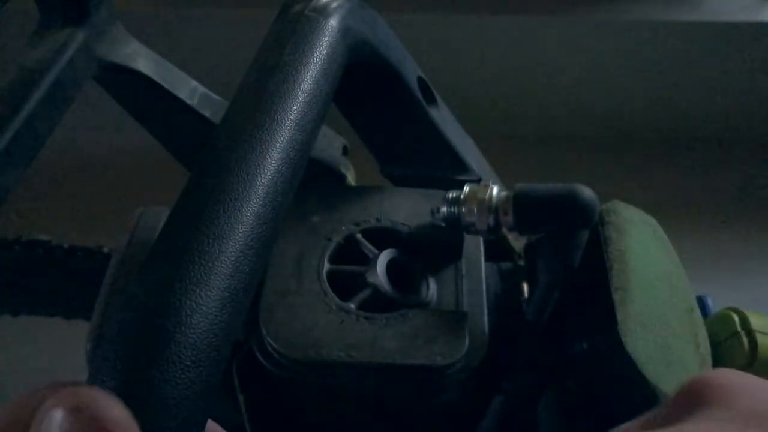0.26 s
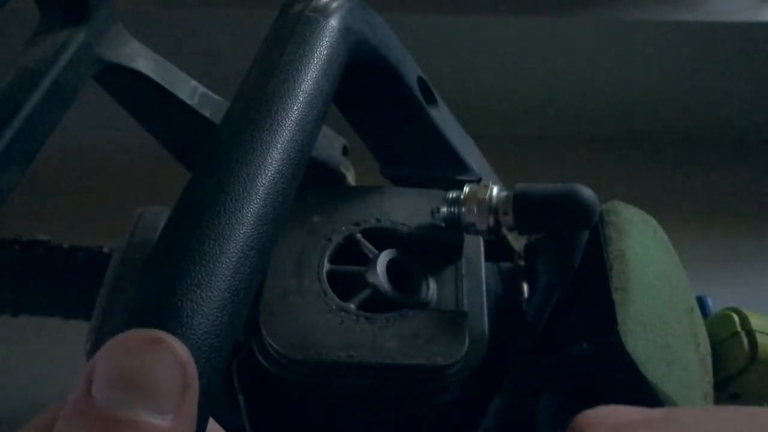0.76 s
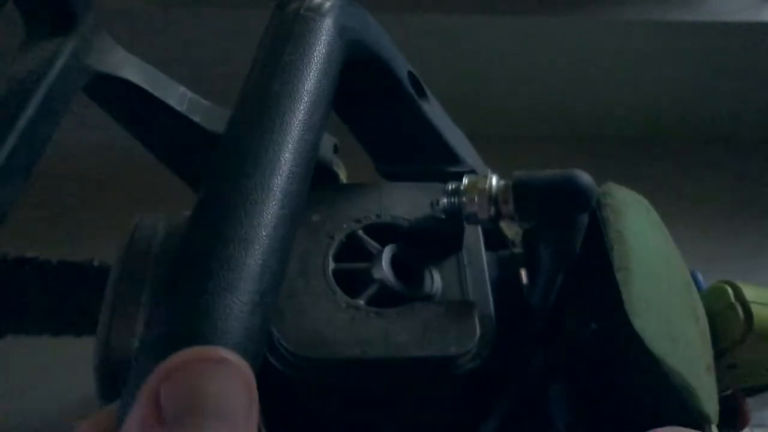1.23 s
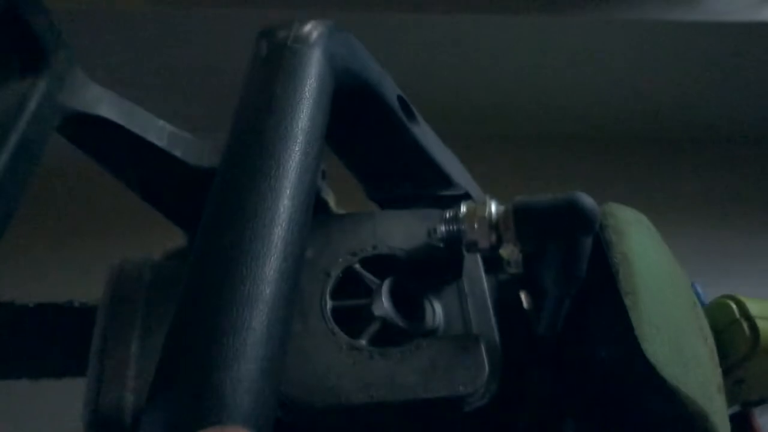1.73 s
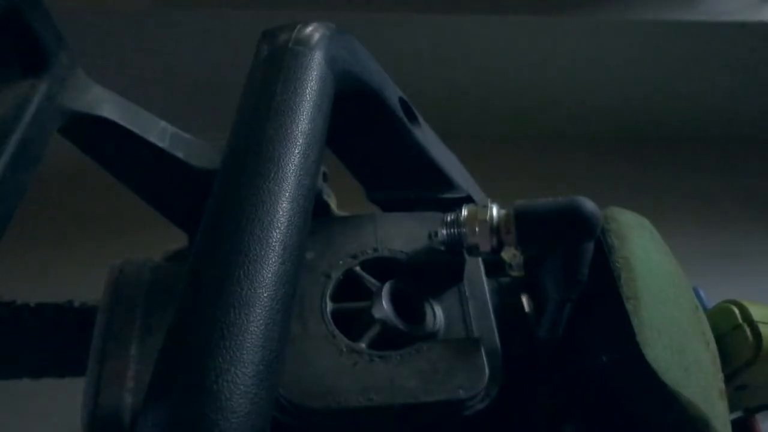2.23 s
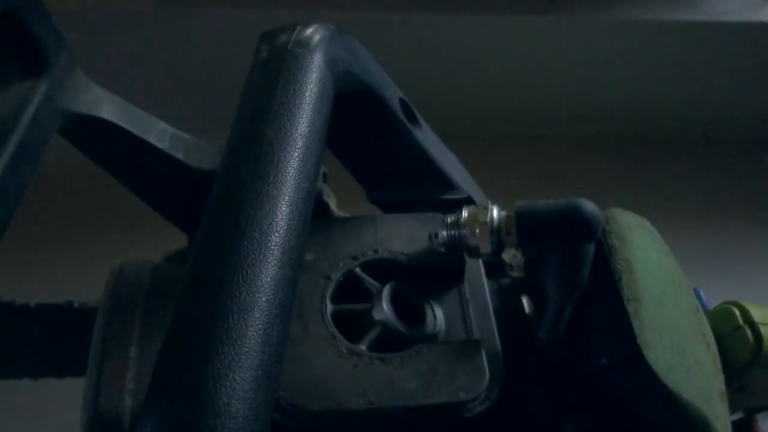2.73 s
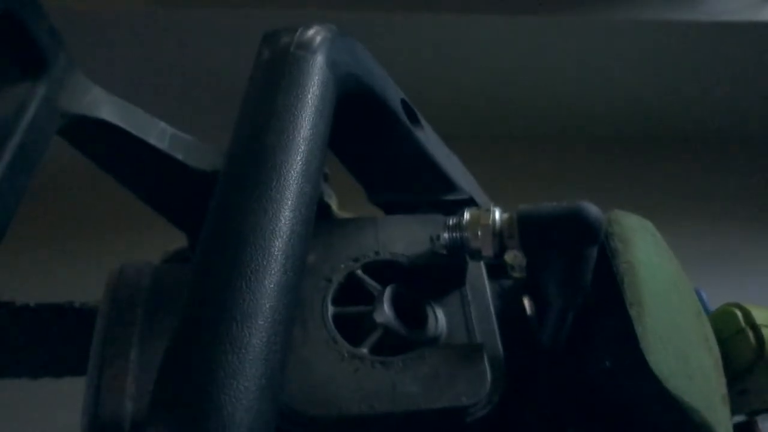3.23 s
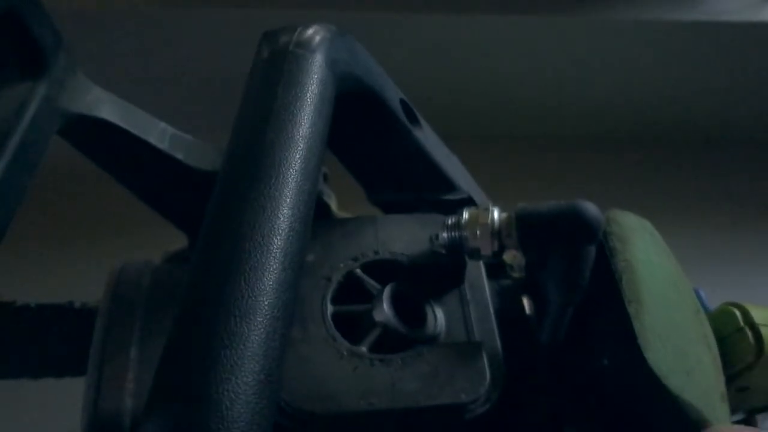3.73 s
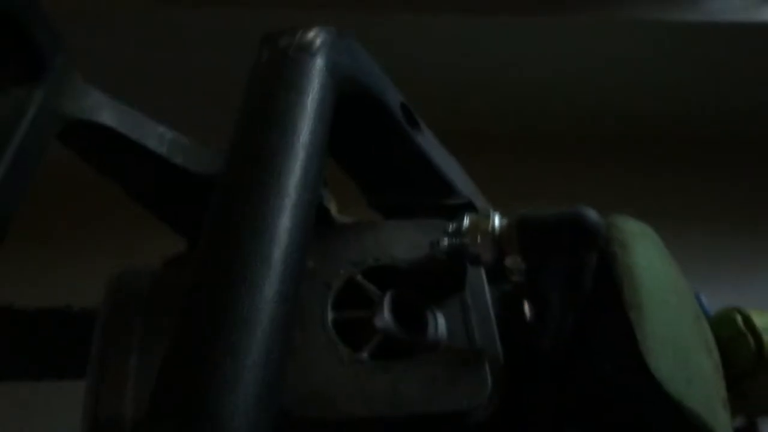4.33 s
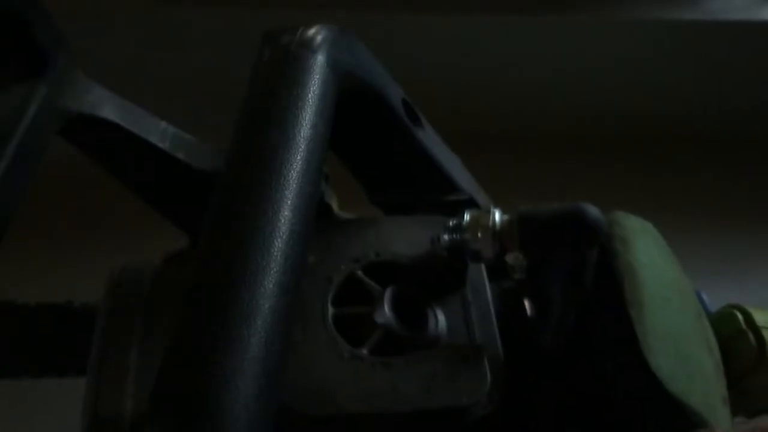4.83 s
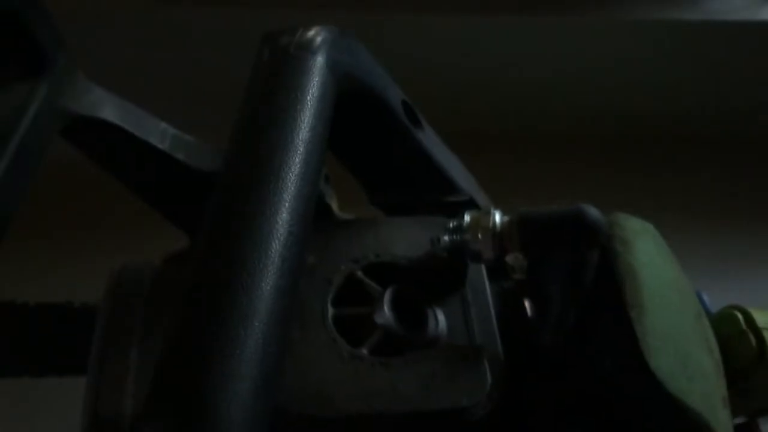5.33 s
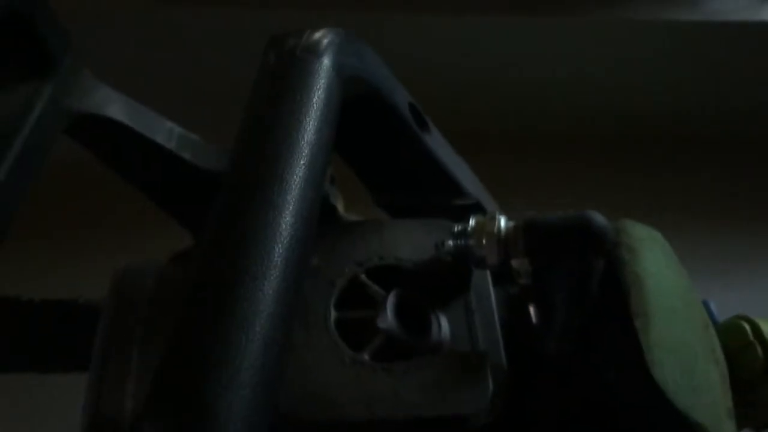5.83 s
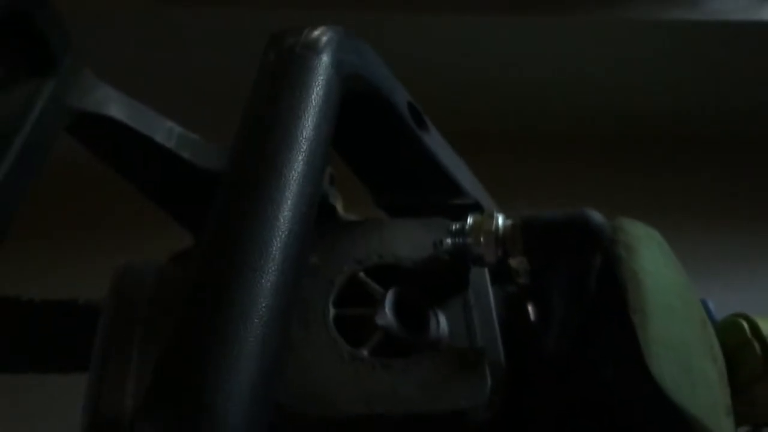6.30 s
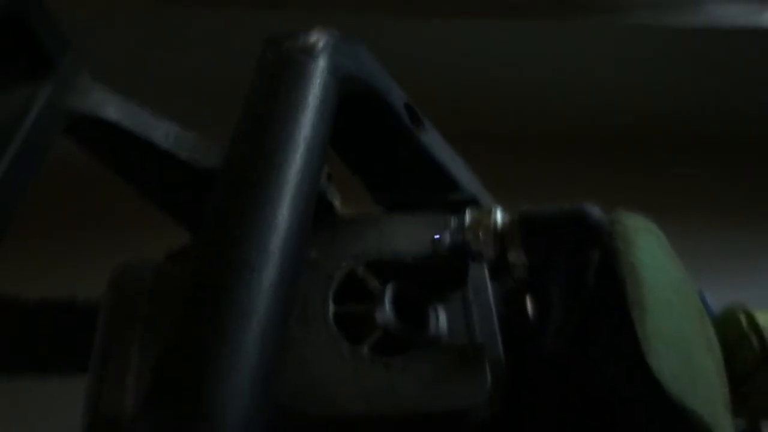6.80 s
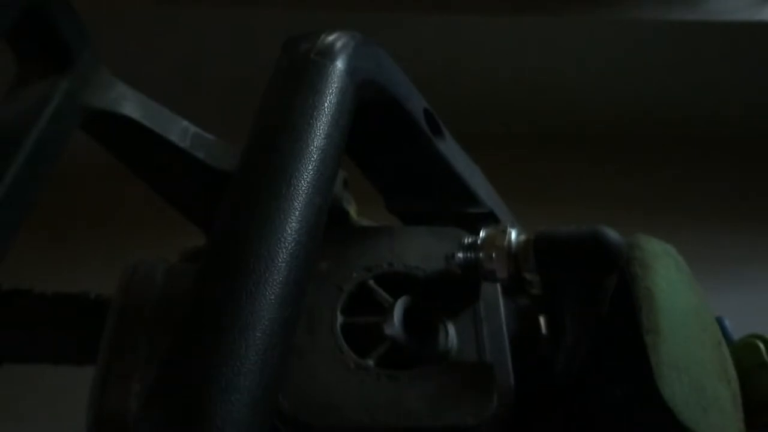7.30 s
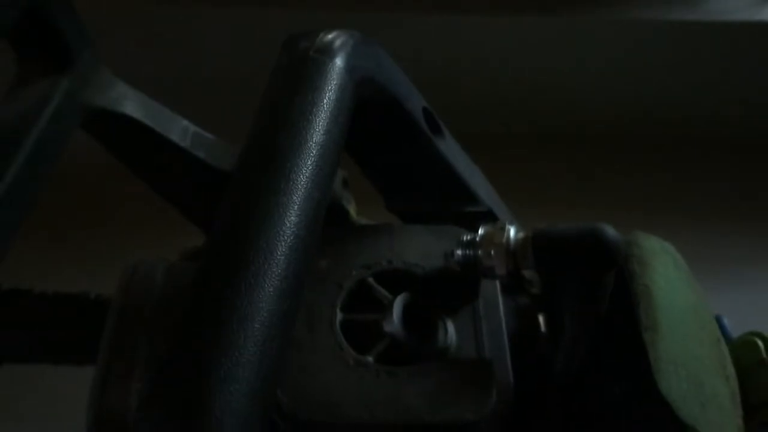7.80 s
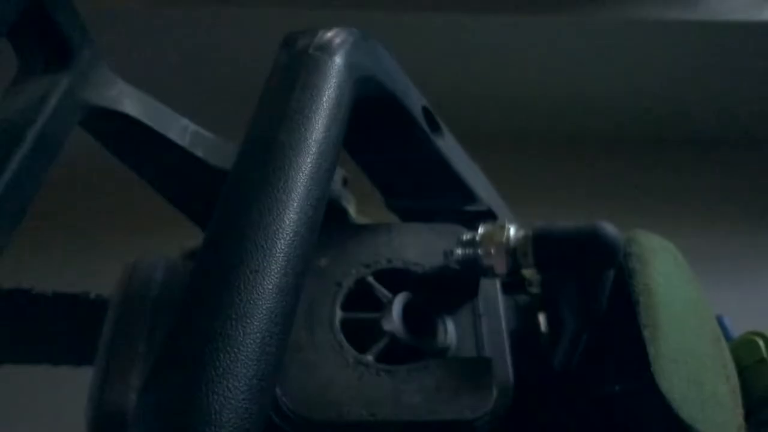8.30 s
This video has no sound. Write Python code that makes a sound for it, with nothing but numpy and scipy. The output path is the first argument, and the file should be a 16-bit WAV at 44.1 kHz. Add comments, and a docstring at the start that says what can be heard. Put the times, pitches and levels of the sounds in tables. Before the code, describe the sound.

A chainsaw's starter rope is yanked four times, chuffing and thumping without firing, each pull followed by a fast ratcheting rewind in a garage.

```python
"""A faint hum in still air, then small ticks and rubs as hands grip a chainsaw in a garage.
Its starter rope is pulled four times and the engine never fires. Each pull: the pawls catch the ringing
flywheel, then the piston pumps air in chuffs, thumps and slaps. Each return: the spring rewinds the rope
while the pawls ratchet over the flywheel. At last the saw is shifted with a few knocks.
Noise is coloured and shaped by envelopes; impulses set decaying sines ringing."""
import sys
import numpy as np
from scipy import signal
from scipy.fft import rfft, irfft, next_fast_len
from scipy.io import wavfile
from scipy.ndimage import uniform_filter1d

SR = 44100
rng = np.random.default_rng(int(sys.argv[2]) if len(sys.argv) > 2 else 0)


def dump_mix(stems):
    """Bounce the given channels to the path in sys.argv[1] as a 16-bit WAV at rate SR."""
    frames = np.atleast_2d(stems).T  # one column per channel
    limited = np.clip(frames, -1, 1)  # hard clip at full scale
    pcm = np.round(limited * 32767).astype(np.int16)
    wavfile.write(sys.argv[1], SR, pcm)


N = 377055

# Levels are relative: each sound adds its own trim. A half length runs from the middle to 1/e of the peak.
# still air behind everything: [t/s, level/dB]
AIR_LEVEL = [(1.8, -62), (8.1, -68)]
# colour of the still air: [f/Hz, level/dB]
AIR_COLOUR = [(24, -18), (40, 2), (124, 4), (942, -11), (1440, -17.5), (15500, -26)]
# faint hum, silent after the last row: [t/s, level/dB]
HUM_LEVEL = [(0, -72), (.5, -61.5), (1.6, -58.5), (2.3, -74)]
# plastic ticks under the hands: [t/s, level/dB, f/Hz]
TICKS = [(.654, -69, 1610), (.86, -67.5, 3030), (1.212, -57.5, 2340), (1.694, -65, 1050),
         (2.176, -64, 2250), (2.398, -61, 2100)]
# hands slide on the handles: [middle t/s, level/dB, half length/s]
GRIPS = [(1.23, -50, 0.076), (1.56, -54, 0.1), (1.74, -53.5, 0.093)]
# colour of skin on the handles: [f/Hz, level/dB]
SKIN_COLOUR = [(50, -13), (100, -8), (165, 6.5), (420, -8), (1100, -17), (3300, -16.5), (6000, -23.5),
               (15000, -39)]
# dull knocks of loose parts and the housing: [t/s, level/dB]
KNOCKS = [(2.175, -44.5), (3.904, -32), (4.891, -29), (6.215, -37), (6.256, -30), (7.458, -28.5),
          (7.878, -37.5), (7.948, -35.5), (8.041, -44.5), (8.118, -40), (8.308, -34), (8.342, -33.5),
          (8.361, -28), (8.526, -40)]
# colour of a dull knock: [f/Hz, level/dB]
KNOCK_COLOUR = [(150, 3), (300, 10), (550, 0), (900, -1.5), (1300, 5), (1900, 0.5), (2600, -6),
                (3600, -5.5), (7000, -14.5), (15000, -27)]
# modes of the housing shaken by a knock: [f/Hz, level/dB]
HOUSING_MODES = [(161, -12), (215, -16), (295, -20)]
# rope and spring coils scrape: [middle t/s, level/dB, half length/s]
SCRAPES = [(.862, -59, 0.016), (3.446, -27.5, 0.025), (4.893, -22, 0.0099), (4.95, -32.5, 0.017),
           (6.185, -28.5, 0.02), (6.248, -37.5, 0.041), (6.38, -52, 0.038), (7.275, -28.5, 0.016),
           (7.453, -24, 0.0052), (7.491, -35, 0.014)]
SCRAPE_GRIT_DB = 2.5  # spread of the roughness
# colour of clattering pawls and scraping rope: [f/Hz, level/dB]
CLATTER_COLOUR = [(900, -30.5), (1700, -8.5), (2550, -11.5), (3100, -2.5), (4400, -6.5), (5700, -5.5),
                  (7000, 0), (8200, -2.5), (9300, -3.5), (15500, -8)]

# rope pulls: [pawls catch t/s, hand eases off t/s, clack level/dB, its brightness level/dB,
#              flywheel ring level/dB, cover clunk level/dB, rush of air level/dB, crank rumble level/dB]
PULLS = [(2.2466, 3.111, -18.5, -9.5, -35, -33.5, -35, -36.5),
         (3.865, 4.348, -21.5, -0.5, -43, -20, -33, -36.5), (5.139, 5.655, -21, 4.5, -32, -42, -34.5, -39),
         (6.4587, 6.9, -24, 8, -32, -36.5, -29, -38)]
# colour of the catching clack: [f/Hz, level/dB]
CATCH_COLOUR = [(200, 13), (550, -1.5), (1200, 8), (1800, 0.5), (2500, -6.5), (3300, 1), (5400, -2),
                (8500, -15)]
# colour of its bright click: [f/Hz, level/dB]
CLICK_COLOUR = [(3000, 3.5), (8500, -5), (12300, 2), (15500, -5)]
# flywheel and starter cup modes: [f/Hz, level/dB, t60/s after a catch]
FLYWHEEL_MODES = [(4121, 0, .19), (4335, -1, .2), (4404, -7, .16), (4570, -7, .38), (5337, 2, .2),
                  (7100, -3, .07), (10358, -13, .08), (12318, -8, .12), (13196, -14, .11)]
# starter cover modes as the pawls catch: [f/Hz, level/dB, t60/s]
COVER_MODES = [(1210, -8, 0.027), (3620, -23, 0.11), (4700, -13, 0.098), (9100, -9, 0.034)]
# crank turns: [port opens t/s, exhaust thump t/s, port closes t/s, strength level/dB]
TURNS = [(2.447, 2.4787, 2.554, -24), (2.683, 2.7063, 2.754, -13), (2.854, 2.8752, 2.913, -13),
         (2.999, 3.0178, 3.052, -12), (3.902, 3.909, 3.981, -25), (4.068, 4.0861, 4.109, -12),
         (4.166, 4.1812, 4.197, -13), (4.247, 4.262, 4.277, -13), (4.327, 4.3424, 4.362, -14),
         (5.206, 5.2309, 5.276, -24), (5.351, 5.3678, 5.391, -14), (5.451, 5.4669, 5.486, -13),
         (5.541, 5.5559, 5.573, -13), (5.627, 5.6422, 5.664, -14), (6.517, 6.5395, 6.576, -22),
         (6.636, 6.6506, 6.665, -14), (6.711, 6.7247, 6.736, -13), (6.775, 6.7895, 6.799, -12),
         (6.836, 6.8507, 6.860, -12), (6.912, 6.9283, 6.963, -16)]
TOP_SHARE = .61  # where in the closed stroke the piston tips over the top
LAST_STROKE_S = .11  # length of the coasting stroke
# colour of rushing air: [f/Hz, level/dB]
RUSH_COLOUR = [(350, -7.5), (600, 1), (1200, 1), (2200, -4), (3340, -7), (3940, -8.5), (9490, -15.5),
               (11300, -12.5), (16000, -22)]
# colour of the crank rumble: [f/Hz, level/dB]
RUMBLE_COLOUR = [(50, -15), (170, 3), (300, 3), (410, -3.5), (550, -11.5), (900, -54)]
CATCH_SPEED_SHARE, RUSH_DB_PER_DOUBLING = 0.23, 8  # crank speed at the catch; loudness gained with speed
RUSH_RISE_DB_PER_S, RUSH_FALL_DB_PER_S = 105, 262
RUMBLE_RISE_DB_PER_S, RUMBLE_FALL_DB_PER_S = 149, 99
WHISTLE_WIDTH_HZ = 75
# the piston rocks back and lets out a soft puff: [t/s, level/dB]
PUFFS = [(3.731, -24), (6.292, -23.5), (7.579, -26.5)]
# the cord squeaks: [middle t/s, level/dB, half length/s]
SQUEAKS = [(2.44, -48, .025), (3.18, -52, .02)]
# the piston slaps at the top of a stroke: [t/s, level/dB, trapped air f/Hz]
SLAPS = [(2.633, -20.5, 1790), (2.816, -19.5, 1820), (2.966, -23, 1350), (3.1062, -23, 1810),
         (4.0379, -20, 1780), (4.144, -29.5, 1690), (4.3068, -24.5, 1310), (4.4313, -29.5, 1810),
         (5.432, -28, 1300), (6.6143, -22, 1500), (6.7603, -21, 1850)]
# cylinder wall modes under a slap: [f/Hz, level/dB, t60/s]
CYLINDER_MODES = [(1940, -10.5, 0.045), (3025, -12, 0.031)]

# rope returns: [start t/s, handle home t/s, whirr level/dB, swell at home level/dB,
#                pawl snap level/dB, pawl edge ring level/dB]
RETURNS = [(3.176, 3.759, -37, -1, -0.5, -10.5), (4.431, 4.918, -41, 5, 3, -29.5),
           (5.738, 6.229, -39.5, 9.5, 3, -21), (7.004, 7.582, -41.5, 4, 1, -43)]
# colour of the whirring pulley: [f/Hz, level/dB]
WHIRR_COLOUR = [(45, -16), (95, -14), (160, 7), (290, -2), (430, -8), (600, -2), (850, -22), (1230, -3.5),
                (1600, -20.5), (3200, -21), (7000, -40)]
WHIRR_START_DB, WHIRR_RISE_S, WHIRR_FALL_DB_PER_S, HOME_SWELL_S = -16, 0.11, 42, 0.06
WHINE_START_HZ, WHINE_TOP_HZ = 470, 674
RATTLES_PER_S, RATTLE_DB = 170, 2.5
# ratchet, one run a return: [first click t/s, teeth/count, shortest gap/s, extra at start/s, extra at end/s]
RATCHET_RUNS = [(3.2531, 16, .01719, .0081, .0294), (4.4636, 19, .01609, .0232, .0342),
                (5.7824, 19, .01571, .0239, .0376), (7.0092, 20, .01519, .0333, .0497)]
# how soon the spring gets the pulley up to speed, how early it slows: [start/teeth, end/teeth]
RATCHET_EASE = (1.637, 2.552)
# a pawl slips over a single tooth: [t/s]
SLIPS = [3.702, 5.743, 6.903, 6.928, 6.959]
# modes of the pawl's own snap: [f/Hz, level/dB, t60/s]
PAWL_MODES = [(6580, -9, 0.006), (7480, -3, 0.0098), (8300, -9.5, 0.017)]
# modes of the pawl's edge: [f/Hz, level/dB, t60/s]
EDGE_MODES = [(3840, -1, 0.0083), (4121, -25.5, 0.062), (14322, -13, .13), (14000, -18, 0.14)]
SING_SPREAD_DB = 4  # how unevenly the teeth set the flywheel singing
GARAGE_T60_S = 0.43
CUTOFF_HZ = 16000


def from_db(db):
    """Decibels to gain."""
    return 10 ** (np.asarray(db) / 20)


def rms_one(x):
    """Scale to unit power."""
    return x / np.sqrt(np.mean(x ** 2) + 1e-20)


def clock():
    """The time of every sample in seconds."""
    return np.arange(N) / SR


def noise(spectrum):
    """Noise of a given colour, falling steeply outside it; rms 1."""
    hz, db = np.transpose(spectrum)
    size = next_fast_len(N)
    log_f = np.log(np.maximum(np.fft.rfftfreq(size, 1 / SR), 1))
    outside = np.abs(log_f - np.clip(log_f, np.log(hz[0]), np.log(hz[-1])))
    shape = from_db(np.interp(log_f, np.log(hz), db)) * np.exp(-2 * np.pi * outside)
    return rms_one(irfft(shape * rfft(rng.standard_normal(size)))[:N])


def flutter(rate_hz):
    """Random wavering up to a given rate; rms 1."""
    lowpass = signal.butter(2, rate_hz, fs=SR, output="sos")
    return rms_one(signal.sosfilt(lowpass, rng.standard_normal(N)))


def narrow(hz, width_hz):
    """Turbulence in a narrow resonance whose centre may move; about rms 1."""
    phase = 2 * np.pi * np.cumsum(hz * np.ones(N)) / SR
    return flutter(width_hz) * np.cos(phase) + flutter(width_hz) * np.sin(phase)


def taps(times, db, spread_db=0):
    """One impulse a contact, its strength varied at random by spread_db."""
    out = np.zeros(N)
    at = np.clip(np.round(times * SR).astype(int), 0, N - 1)
    out[at] = from_db(db + spread_db * rng.standard_normal(len(times)))
    return out


def grains(rate_per_s, weakest, strongest):
    """Impulses at random moments and of random height."""
    return (rng.random(N) < rate_per_s / SR) * rng.uniform(weakest, strongest, N)


def fade(impulses, t60):
    """Each impulse starts an envelope that dies away."""
    return signal.lfilter([1], [1, -from_db(-60 / (t60 * SR))], impulses + 1e-18)


def ring(impulses, hz, t60):
    """Each impulse sets a decaying sine ringing, scaled by the impulse's height."""
    r = from_db(-60 / (t60 * SR))
    w = 2 * np.pi * hz / SR
    return signal.lfilter([0, np.sin(w)], [1, -2 * r * np.cos(w), r * r], impulses + 1e-18)


def chirp(impulses, start_hz, end_hz, glide_s, t60):
    """Each impulse rings a cavity whose pitch glides as it dies."""
    t = np.arange(SR // 10) / SR
    hz = end_hz + (start_hz - end_hz) * np.exp(-t / glide_s)
    glide = np.sin(2 * np.pi * np.cumsum(hz) / SR) * from_db(-60 * t / t60)
    return signal.fftconvolve(impulses, glide)[:N]


def swells(rows):
    """Bell-shaped envelopes from rows of (middle, dB, half length)."""
    t, out = clock(), np.zeros(N)
    for s, db, half in rows:
        near = slice(max(int((s - np.pi * half) * SR), 0), int((s + np.pi * half) * SR))
        out[near] += from_db(db) * np.exp(-((t[near] - s) / half) ** 2)
    return out


def still_air():
    """Steady coloured noise whose level drifts slowly."""
    return from_db(np.interp(clock(), *np.transpose(AIR_LEVEL))) * noise(AIR_COLOUR)


def faint_hum(hum_hz=118):
    """A low sine wavering a little in phase and level."""
    level = from_db(np.interp(clock(), *np.transpose(HUM_LEVEL), right=-np.inf))
    tone = np.sqrt(2) * np.sin(2 * np.pi * hum_hz * clock() + flutter(4.2) / 2)
    return level * tone * from_db(1.3 * flutter(4.1))


def knock(s, db):
    """A dull blow on the housing: a softened burst of coloured noise."""
    blow = fade(taps(s + 0.00046, db - 3.5), 0.065)
    return uniform_filter1d(blow, size=80) * noise(KNOCK_COLOUR)


def handling():
    """Hands tick and rub on the handles; loose parts knock and shake the housing."""
    slip = rng.standard_normal(N)
    ticks = sum(ring(swells([(when, level, .004)]) * slip, hz, 0.0088) for when, level, hz in TICKS)
    # the plastic creaks under the fingers
    creaks = fade(grains(130, .3, 1), 0.015)
    rub = noise(SKIN_COLOUR) * from_db(1.5 * flutter(40)) + from_db(-6) * creaks * noise(KNOCK_COLOUR)
    s, db = np.transpose(KNOCKS)
    # louder knocks shake the housing a little less in proportion
    shake = sum(ring(taps(s + 0.0035, 0.87 * db + level), hz, 0.23) for hz, level in HOUSING_MODES)
    return ticks + swells(GRIPS) * rub + knock(s, db) + shake


def scrapes():
    """Rope and spring coils scrape: short swells of gritty noise."""
    grit = from_db(SCRAPE_GRIT_DB * flutter(960))
    return swells(SCRAPES) * (noise(CLATTER_COLOUR) + from_db(-10.5) * noise(KNOCK_COLOUR)) * grit


def catches():
    """The pawls clack against the flywheel, which rings like a small bell; the cover clunks."""
    s, _, clack_db, bright_db, ring_db, boom_db, *_ = np.transpose(PULLS)
    blow = fade(taps(s, clack_db - 4), .036) + fade(taps(s, clack_db - 28), .25)
    # each pawl slides for a moment around the bite
    slide = swells([(when, level - 24, .003) for when, level in zip(s, clack_db)])
    clack = (uniform_filter1d(blow, size=110) + slide) * noise(CATCH_COLOUR)
    click = uniform_filter1d(fade(taps(s, clack_db + bright_db), .022), size=40) * noise(CLICK_COLOUR)
    bell = sum(ring(taps(s + 0.003, ring_db + level, 0.66), hz, t60) for hz, level, t60 in FLYWHEEL_MODES)
    boom_colour = [(270, 9.0), (420, 11.0), (600, -4), (1500, -23)]
    boom = fade(taps(s + 0.0029, boom_db - 4), .13) * noise(boom_colour)
    cover = sum(ring(taps(s + 0.003, boom_db + level), hz, t60) for hz, level, t60 in COVER_MODES)
    shake = ring(taps(s + 0.0043, clack_db - 9), 304, .09)
    return clack + click + bell + boom + cover + shake


def turns():
    """Crank turns as columns: port opens, thump, port closes, stroke top, next opening (s); strength (dB)."""
    runs = []
    for catch, *_ in PULLS:
        opens, thump, closes, db = np.transpose([turn for turn in TURNS if catch < turn[0] < catch + 1])
        reopens = np.append(opens[1:], closes[-1] + LAST_STROKE_S)
        top = closes + TOP_SHARE * (reopens - closes)
        runs.append([opens, thump, closes, top, reopens, db])
    return np.hstack(runs)


def piston_height():
    """0 with the port open, 1 at the top of the stroke."""
    _, _, closes, top, reopens, _ = turns()
    return np.interp(clock(), np.column_stack([closes, top, reopens]).ravel(), np.tile([0, 1, 0], len(top)))


def effort():
    """Gains of rush and rumble: both build to the first thump and die as the hand eases; rush follows speed."""
    t, rush, rumble, thumps = clock(), 0, 0, turns()[1]
    for catch, eased, *_, rush_db, rumble_db in PULLS:
        thump = thumps[(thumps > catch) & (thumps < catch + 1)]
        period = np.diff(thump)
        speed = period.min() / period  # 1 at the fastest turn
        speed_times = np.append(catch, thump[:-1] + period / 2)
        speed = np.interp(t, speed_times, np.append(CATCH_SPEED_SHARE * speed[0], speed))
        coast = np.clip(t - eased, 0, 1)
        early = np.clip(thump[0] - t, 0, 1)
        rush_db = rush_db + RUSH_DB_PER_DOUBLING * np.log2(speed)
        rush += (t > catch) * from_db(rush_db - RUSH_RISE_DB_PER_S * early - RUSH_FALL_DB_PER_S * coast)
        rumble_db = rumble_db - RUMBLE_RISE_DB_PER_S * early - RUMBLE_FALL_DB_PER_S * coast
        rumble += (t > catch) * from_db(rumble_db)
    return rush, rumble


def pull():
    """The rope spins the crank: gritty rush eased by compression, rumble, pumping piston and its slaps."""
    (rush, rumble), height = effort(), piston_height()
    grit = from_db(3.6 * flutter(380) + 2.6 * flutter(40))
    # the cord ticks through its eyelet
    ticks = fade(grains(70, 0.35, 1.7), 0.011)
    gritty_air = grit * from_db(-4.0 - 1.9 * height) * noise(RUSH_COLOUR)
    air = rush * (gritty_air + from_db(1.5) * ticks * noise(CLATTER_COLOUR))
    return air + rumble * noise(RUMBLE_COLOUR) + cylinder(rush, height) + exhaust() + slaps()


def squeaks(high_hz=11600, low_hz=9200, sag_hz_per_s=22000):
    """The taut cord squeaks thinly in its eyelet: one band holds, a lower one slides down."""
    out = 0
    for row in SQUEAKS:
        sliding_hz = low_hz - sag_hz_per_s * (clock() - row[0])
        out += swells([row]) * (narrow(high_hz, 450) + narrow(sliding_hz, 200) / 2)
    return out


def cylinder(rush, height, low_hz=860, high_hz=2400):
    """Cylinder air rings and spurts at the ports, and whistles hoarsely higher as the piston shrinks it."""
    opens, thump, closes, _, _, db = turns()
    squeeze_db = np.interp(closes, clock(), 20 * np.log10(rush + 1e-4))
    opening = chirp(taps(opens + 0.00049, db - 3.5), start_hz=1033, end_hz=843, glide_s=0.0041, t60=0.026)
    closing = chirp(taps(closes, squeeze_db / 2 - 2.5), start_hz=780, end_hz=1130, glide_s=0.013, t60=0.03)
    puffs = ring(taps(*np.transpose(PUFFS)), 824, 0.014)
    gulps = ring(taps(thump - .0105, db - 8.5, 3.1), 1090, 0.043)
    spurts = swells([(s - .009, level - 15.5, .0035) for s, level in zip(thump, db)])
    spurts = spurts + fade(taps(opens, db - 19), 0.024)
    jets = spurts * (noise(RUSH_COLOUR) + from_db(-14.5) * narrow(3200, 300))
    # the whistle needs a moving piston
    climbing = uniform_filter1d(np.sign(np.gradient(height)), size=150)
    whistle_hz = low_hz * (high_hz / low_hz) ** (height ** 1.3)
    whistle = narrow(whistle_hz, WHISTLE_WIDTH_HZ) * np.abs(climbing)
    return opening + closing + puffs + gulps + jets + rush * whistle * from_db(-1.5 - 4.3 * height)


def exhaust(pipe_hz=165, build_s=0.0085, stop_s=0.0019, lead_s=0.0012):
    """Air swings in the muffler, grows for a few cycles and is choked by the piston; the housing rings on."""
    _, thump, _, _, _, db = turns()
    t = np.arange(-2000, 2001) / SR
    width_s = np.where(t < lead_s, build_s, stop_s)
    swing = np.cos(2 * np.pi * pipe_hz * t) * np.exp(-((t - lead_s) / width_s) ** 2)
    housing = ring(taps(thump + 0.0083, db - 23.5, 2.02), 150, 0.15)
    housing += ring(taps(thump + 0.0026, db - 16.5, 2.0), 216.5, 0.19)
    return signal.fftconvolve(taps(thump, db + 1.4), swing, "same") + housing


def slaps():
    """At the top of the stroke the piston tips and slaps the wall; the trapped air sets the pitch."""
    s, db, _ = np.transpose(SLAPS)
    s = s + .001
    air = sum(ring(taps(np.array([when + .001]), level + 0.5), hz, 0.017) for when, level, hz in SLAPS)
    wall = sum(ring(taps(s, db + level), hz, t60) for hz, level, t60 in CYLINDER_MODES)
    return air + wall + knock(s, db - 4.5)


def rewind():
    """The pulley whirrs in its plastic cover with a rising whine, changes level near home and runs out."""
    t, level, whine_hz = clock(), 0, WHINE_START_HZ
    for start, home, whirr_db, swell_db, *_ in RETURNS:
        rise_db = np.interp(t, [start, start + WHIRR_RISE_S], [WHIRR_START_DB, 0])
        home_db = swell_db / (1 + ((t - home) / HOME_SWELL_S) ** 2)
        fall_db = WHIRR_FALL_DB_PER_S * np.maximum(t - home, 0)
        level += (t > start) * from_db(whirr_db + rise_db + home_db - fall_db)
        rising_hz = np.interp(t, [start, (start + home) / 2], [WHINE_START_HZ, WHINE_TOP_HZ])
        whine_hz = np.where(t > start, rising_hz, whine_hz)
    whirr = from_db(-3) * noise(WHIRR_COLOUR) + from_db(-15) * narrow(whine_hz, 60)
    whirr = whirr * from_db(1.9 * flutter(54.0))
    # the handle and loose parts rattle along
    rattle = fade(grains(RATTLES_PER_S, 0.08, 1), 0.014) * noise(KNOCK_COLOUR)
    return level * (whirr + from_db(RATTLE_DB) * rattle)


def spin(run, ease):
    """A wheel gathers speed, runs and slows: the time of each step."""
    first, count, shortest, extra_start, extra_end = run
    k = np.arange(count - 1)
    gaps = shortest + extra_start * np.exp(-k / ease[0]) + extra_end * np.exp((k - count + 2) / ease[1])
    return first + np.append(0, np.cumsum(gaps))


def seat_ring(s, db, t60=0.04, bounce_db=-7):
    """Two pawls take turns; each bounces once and rings its seat with a dense set of modes of its own."""
    bounce = s + rng.uniform(.001, .005, len(s))
    t = np.arange(SR // 10) / SR
    bodies = noise(CLATTER_COLOUR)[:2 * len(t)].reshape(2, -1) * from_db(-60 * t / t60)
    out = 0
    for k, body in enumerate(bodies):
        hits = taps(s[k::2], db[k::2], 1.5) + taps(bounce[k::2], db[k::2] + bounce_db, 0.73)
        out += signal.fftconvolve(hits, body)[:N]
    return out


def ratchet(bright_db=9.0):
    """Pawls snap off teeth, chatter in their seats and set the flywheel singing; faster teeth strike harder."""
    s = np.sort(np.concatenate([SLIPS] + [spin(run, RATCHET_EASE) for run in RATCHET_RUNS]))
    db = -11 - 1.2 * np.log2(np.minimum(np.gradient(s), .06) / .02) - np.isin(s, SLIPS)
    # the pawl sits a little differently in each return
    _, home, _, _, snap_db, edge_db = np.transpose(RETURNS)
    which = np.searchsorted(home, s)
    snap_db, edge_db = snap_db[which], edge_db[which]
    snap = 0
    for k, (hz, level, t60) in enumerate(PAWL_MODES):
        # neighbouring modes start in opposite directions
        snap += (-1) ** k * ring(taps(s, db + snap_db + level - 4.0, 2.0), hz, t60)
    snap = signal.sosfilt(signal.butter(2, 2500, "high", fs=SR, output="sos"), snap)
    crack = fade(taps(s, db - 8.5, 1), 0.0039) + fade(taps(s, db - 23.5), 0.09)
    chatter = seat_ring(s, db - 14.0) + crack * noise(CLATTER_COLOUR)
    singing = 0
    for hz, level, t60 in FLYWHEEL_MODES:
        # a light tap favours the high modes
        sing_db = db + level - 33.0 + bright_db * np.log2(hz / 4000)
        singing += ring(taps(s, sing_db, SING_SPREAD_DB), hz, t60 * 2 / 3)
    edge = sum(ring(taps(s, db + edge_db + level, 2), hz, t60) for hz, level, t60 in EDGE_MODES)
    return snap + chatter + singing + edge


def garage(x, wet_db=-15, wall_hz=5000):
    """Scattered echoes off the walls, dull and short."""
    t = np.arange(SR // 2) / SR
    tail = rng.standard_normal(len(t)) * from_db(-60 * t / GARAGE_T60_S) * (t > .006)
    dull = signal.butter(1, wall_hz, fs=SR, output="sos")
    tail = signal.sosfilt(dull, tail / np.linalg.norm(tail))
    return x + from_db(wet_db) * signal.fftconvolve(x, tail)[:N]


def scene():
    """The saw close by, over still air and a faint hum."""
    saw = handling() + scrapes() + catches() + pull() + squeaks() + rewind() + ratchet()
    return (still_air() + faint_hum() + garage(saw))[None]


def record(dry):
    """The microphone loses the deepest bass; the top is cut steeply."""
    lean = signal.sosfilt(signal.butter(4, 45, "high", fs=SR, output="sos"), dry)
    return signal.sosfilt(signal.ellip(10, .2, 80, CUTOFF_HZ, fs=SR, output="sos"), lean)


dry = scene()
out = record(dry)
dump_mix(out)
```